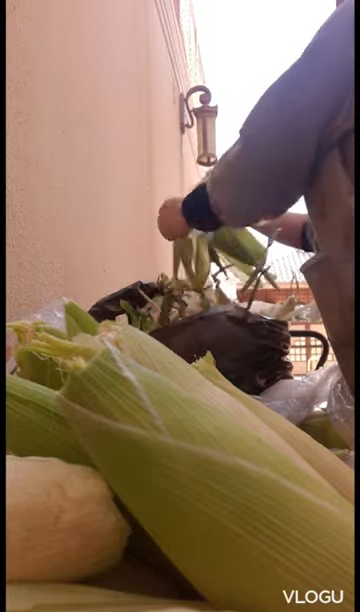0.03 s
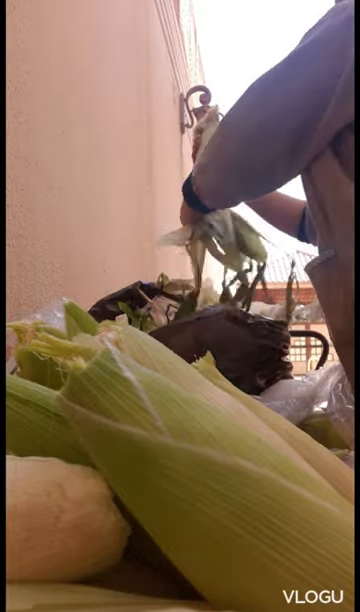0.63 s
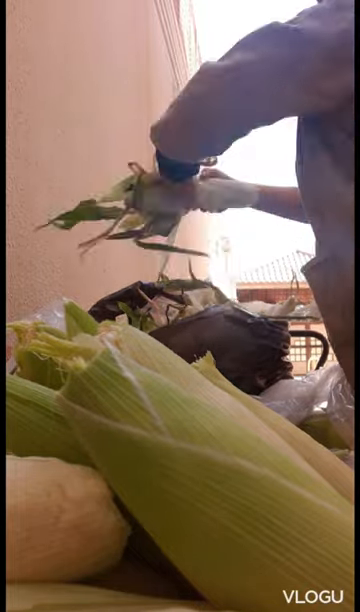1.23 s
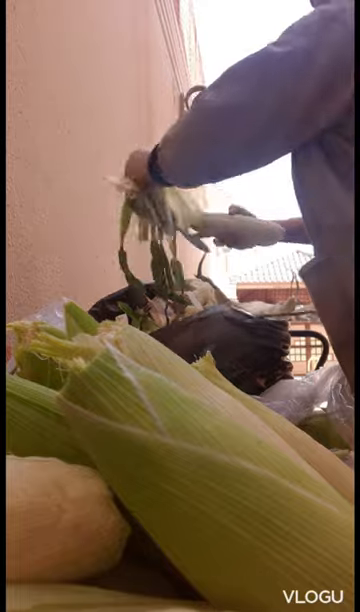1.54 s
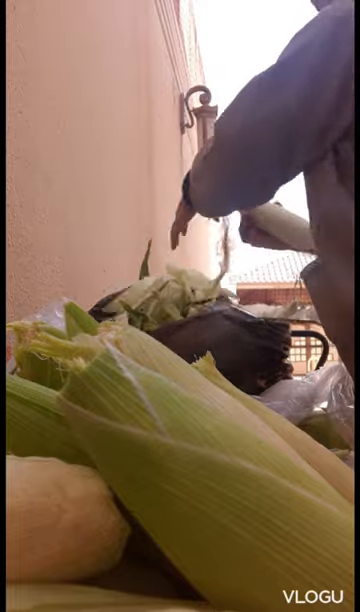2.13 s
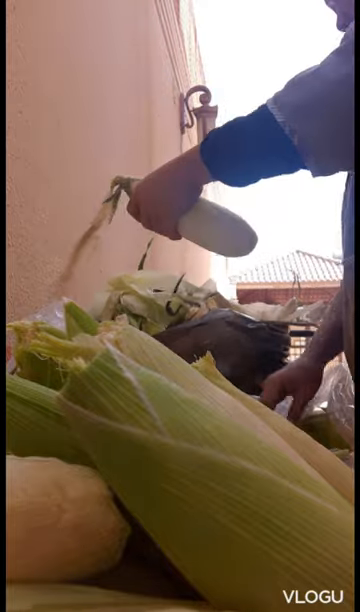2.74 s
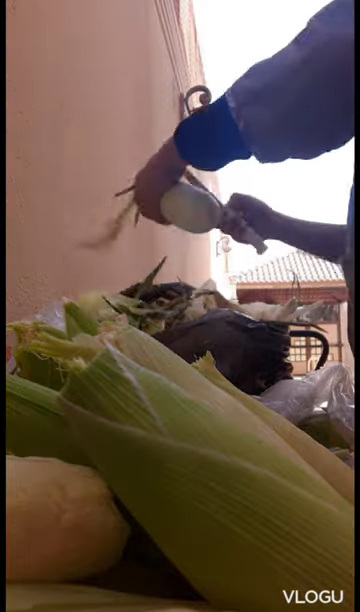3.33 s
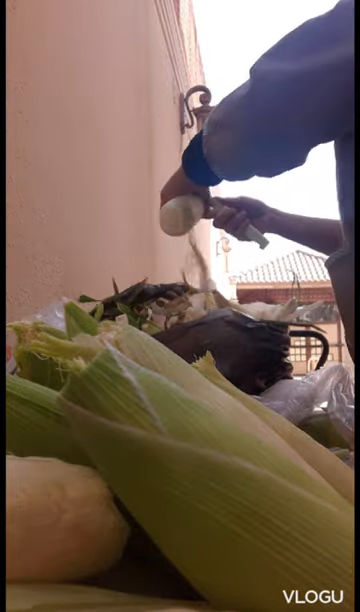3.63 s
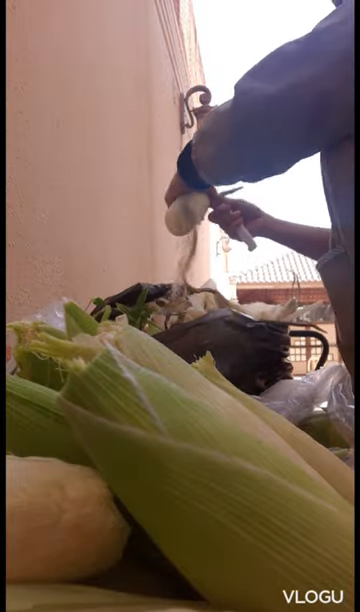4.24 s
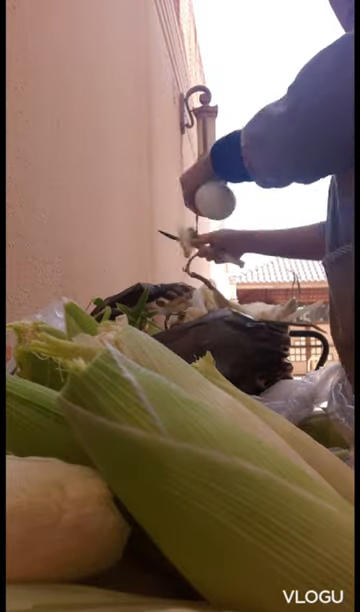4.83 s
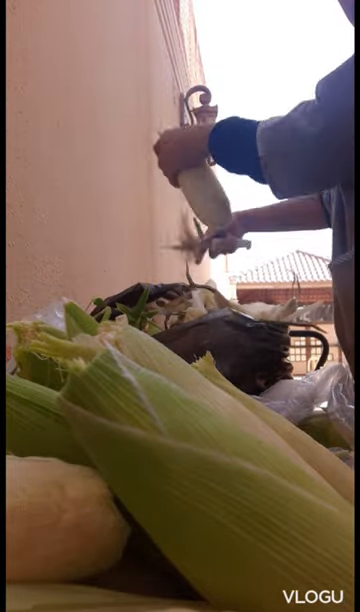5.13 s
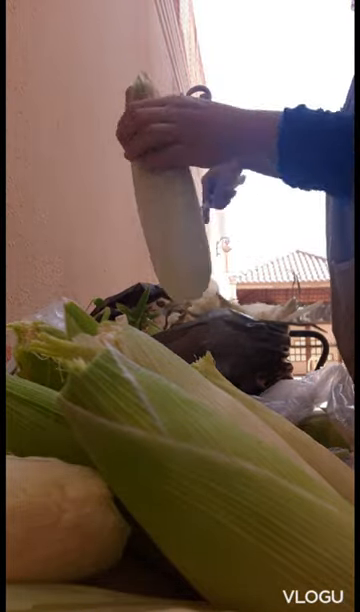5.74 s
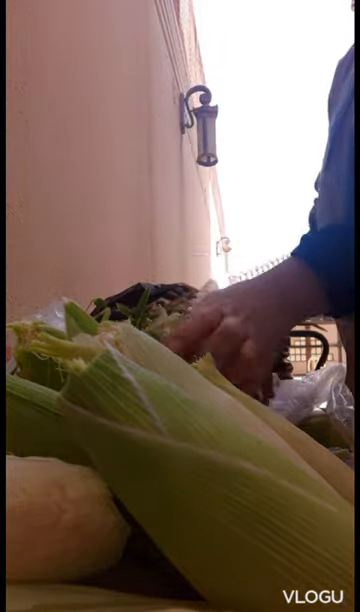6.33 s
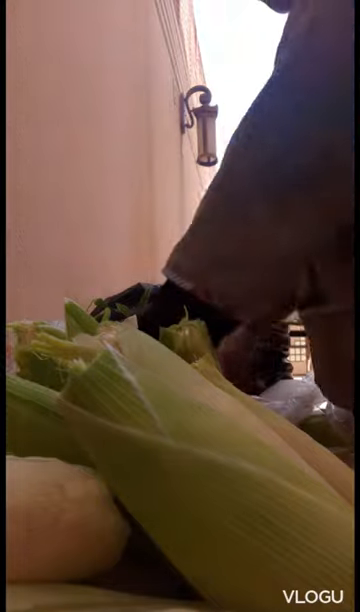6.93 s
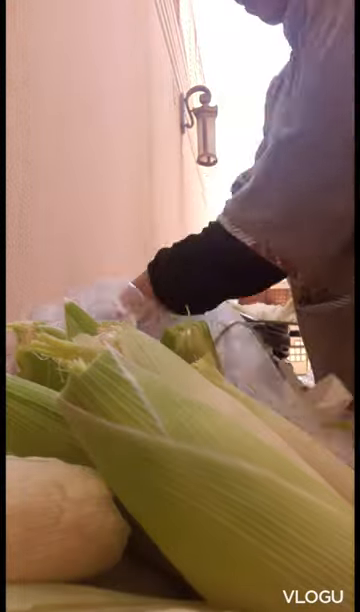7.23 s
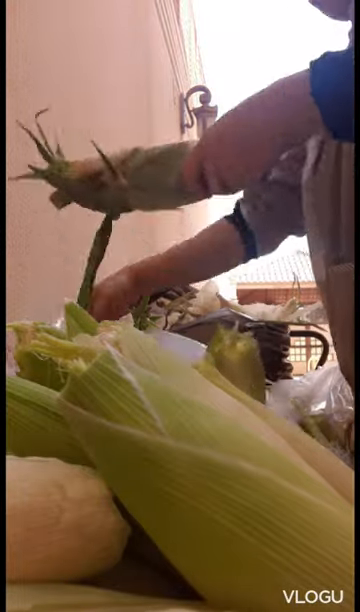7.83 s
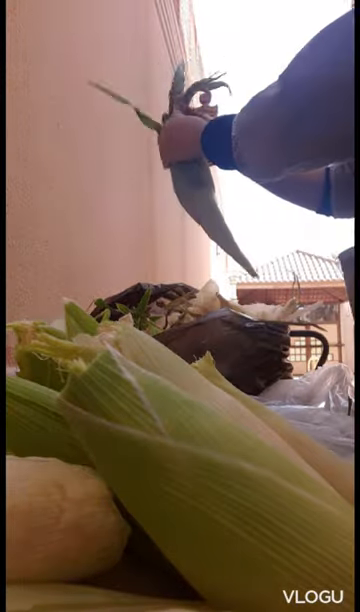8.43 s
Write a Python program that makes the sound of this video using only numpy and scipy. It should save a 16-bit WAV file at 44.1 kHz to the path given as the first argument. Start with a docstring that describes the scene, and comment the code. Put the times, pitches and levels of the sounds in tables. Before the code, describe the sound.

Someone husks corn with crisp rips and one loud snap, trims it with a knife, then rummages in a plastic bag.

```python
"""Husking corn on a balcony

Leaves rustle and tear as hands pull them off, the stalk snaps, and a knife clicks through the tip. The cob
knocks on the table beside the microphone, and the next ear is pulled from a crinkling bag and gripped. Rustles
and tears are runs of tiny clicks from creases and fibres; knocks are dying tones. Traffic hums in the distance,
and the close walls add a short ring."""
import sys
import numpy as np
from scipy import signal
from scipy.fft import rfft, irfft, next_fast_len
from scipy.io import wavfile
from scipy.ndimage import uniform_filter1d

SR = 44100
rng = np.random.default_rng(int(sys.argv[2]) if len(sys.argv) > 2 else 0)


def transcribe(u):
    """Save the signal u as a 16-bit wav file named by the first command-line argument.

    u: samples, shape (n,) or (channels, n), limited to [-1, 1]; the rate is SR.
    q: integer samples, one column per channel.
    """
    v = np.clip(np.atleast_2d(u).T, -1, 1)
    q = np.round(v * 32767).astype(np.int16)
    wavfile.write(sys.argv[1], SR, q)


N = 379260
T = np.arange(N) / SR

# Levels in the tables are relative. A stroke's t is its fastest moment.
# hand strokes through the leaves: t/s, level/dB, rise/s, fall/s
LEAF_STROKES = [(0.17, -57.5, 0.061, 0.027), (0.245, -56, 0.015, 0.025), (0.335, -56.5, 0.0097, 0.022),
                (.425, -54, .01, 0.026), (0.492, -46, 0.02, 0.028), (0.61, -48.5, 0.053, 0.073),
                (0.69, -52.5, 0.033, 0.02), (0.84, -64, .06, 0.076), (1.275, -53, 0.11, 0.037),
                (1.35, -52, 0.0056, 0.015), (1.495, -48.5, 0.072, 0.06), (1.575, -51, 0.032, 0.032),
                (1.69, -59.5, 0.023, 0.048), (1.875, -54, 0.012, 0.036), (1.94, -48.5, .02, 0.051),
                (2.005, -48, 0.043, 0.054), (2.235, -54, 0.012, 0.055), (2.48, -55.5, 0.042, 0.028),
                (3.52, -60, .07, 0.05), (3.57, -58.5, 0.04, 0.024), (3.81, -69.5, 0.041, .07),
                (4.11, -61, 0.041, .02), (4.465, -60, 0.005, 0.063), (4.55, -61, 0.047, 0.021),
                (5.21, -55.5, 0.011, 0.04), (5.56, -66.5, 0.045, 0.034), (5.73, -73.5, 0.1, 0.026)]
# pulls on the plastic bag, then, from 8.0 s, the next ear's husk being gripped: t/s, level/dB, rise/s, fall/s
BAG_AND_HUSK_STROKES = [(6.09, -59.5, 0.028, 0.059), (6.21, -50.5, 0.046, 0.047), (6.69, -63, 0.0099, 0.063),
                        (6.815, -53.5, 0.056, 0.077), (7.13, -42, 0.081, 0.079), (7.152, -40, 0.014, .012),
                        (7.275, -40.5, 0.041, 0.044), (7.365, -42, 0.03, 0.044), (7.44, -46.5, 0.034, 0.086),
                        (7.50, -52, 0.018, 0.077), (7.597, -50, 0.0045, 0.0091), (7.8, -60, 0.35, 0.19),
                        (8.01, -51, 0.0367, 0.027), (8.085, -48, 0.015, 0.034), (8.19, -48.5, 0.076, 0.16),
                        (8.355, -47.5, 0.068, 0.048), (8.437, -48.5, 0.00656, 0.013), (8.6, -58, 0.13, 0.043)]
# ears of corn scraping together in the bag: t/s, level/dB, rise/s, fall/s
EAR_SHOVES = [(6.835, -56, 0.0098, 0.033), (7.03, -47.5, 0.023, 0.011), (7.072, -42, 0.0041, .01),
              (7.105, -42, 0.0055, 0.01), (7.155, -39.5, 0.014, 0.0073), (7.27, -47, 0.027, 0.019),
              (8.18, -53, .03, .03)]
# sleeve and corn silk brushing as the knife is fetched: t/s, level/dB, rise/s, fall/s
SLEEVE_BRUSHES = [(2.79, -65.5, 0.023, 0.031), (2.89, -65, 0.013, 0.029), (3.05, -65, 0.055, 0.04),
                  (3.21, -68, 0.061, 0.06), (3.38, -68.5, 0.043, .04)]
# tears and cuts: t/s, length/s, juicy stalk level/dB, dry fibre level/dB, hollow ring f/Hz
HUSK_TEARS = [(0.0, 0.05, -32.5, -37.5, 1380), (0.606, 0.021, -33.5, -48, 1500),
              (0.637, 0.048, -38.5, -44, 1650), (0.683, 0.019, -45, -51, 1400),
              (2.197, 0.04, -59, -52.5, 2900), (3.631, 0.027, -36, -59, 1250),
              (3.87, 0.025, -37.5, -45.5, 1650), (3.896, 0.0226, -35.5, -45, 1420),
              (4.076, 0.046, -53, -55, 1500), (4.25, 0.026, -46, -52, 1700), (4.287, 0.026, -48, -42, 1640),
              (4.318, 0.014, -51, -47, 1270), (4.712, 0.025, -49, -46.5, 1150),
              (5.202, 0.022, -61, -54, 1600), (8.337, 0.026, -48, -46.5, 2800)]
# leaf ribs and fibres cracking: t/s, level/dB, f/Hz
RIB_CRACKS = [(0.0065, -28, 1950), (0.0206, -25.5, 3380), (0.0218, -29.5, 1260), (0.0333, -19, 1310),
              (0.0408, -38.5, 1470), (0.562, -32.5, 2997), (0.5922, -32.5, 2980), (0.6082, -27, 1293),
              (0.6183, -32, 1500), (0.6395, -21.5, 1550), (0.642, -27, 2550), (0.652, -32, 2700),
              (0.664, -32, 2400), (0.6787, -30, 1360), (0.756, -34.5, 4330), (0.935, -40.5, 3300),
              (0.975, -45, 2972), (1.042, -50, 3000), (1.1753, -31, 1510), (1.1848, -32, 3080),
              (2.1996, -34, 1630), (2.235, -37, 2900), (3.642, -40, 1240), (3.8725, -35, 1800),
              (3.886, -36, 1351), (3.908, -26, 1450), (3.915, -31, 1350), (4.111, -37, 1700),
              (4.1185, -39, 1500), (4.252, -39, 1900), (4.3, -31, 1955), (4.309, -32, 1700),
              (4.322, -31, 1224), (4.3306, -30, 1360), (4.342, -28, 1250), (4.4621, -44.5, 3240),
              (4.498, -38.5, 2810), (6.145, -31, 1750), (6.2044, -34, 2390), (6.8069, -29.5, 1310),
              (7.1, -31, 760), (7.211, -23.5, 2090), (8.009, -29.5, 1830), (8.0696, -23.5, 1630),
              (8.084, -29.5, 3410), (8.4308, -22.5, 3170)]
# the knife snapping through the tip: t/s, level/dB
KNIFE_CUTS = [(4.6018, -36), (4.6108, -27), (4.6194, -34), (4.629, -31.5), (4.7114, -23.5), (4.7132, -24),
              (4.7257, -27), (4.7287, -23.5)]
# the two pops of the breaking stalk: t/s, level/dB, f/Hz, rise/s
STALK_POPS = [(1.0912, -9, 1390, .0007), (1.0963, -20, 1000, .0004)]
# knocks on the table: t/s, level/dB, contact time/s
TABLE_KNOCKS = [(2.776, -34, 0.0032), (6.145, -29.5, 0.0031), (6.211, -19, 0.0028), (6.822, -37, 0.0027),
                (7.034, -21.5, 0.0055), (7.064, -33, 0.0014), (7.269, -28, 0.0038), (8.014, -33, 0.0027),
                (8.23, -22, 0.0086), (8.247, -23.5, 0.001), (8.331, -32, 0.0023), (8.37, -27, 0.0018),
                (8.409, -25, 0.002), (8.427, -25.5, 0.0025), (8.469, -27, 0.0021)]
# ringing tones of the table and the cob: f/Hz, level/dB, time to fade by 60 dB/s
TABLE_TONES = [(67, -20, 0.94), (82.4, -2.5, 0.14), (109.8, -4, 0.19), (186, -14.5, 0.17),
               (219, -12.5, 0.1), (281, -10.5, 0.084), (315.5, -4, 0.11)]
COB_TONES = [(790, 0, 0.018), (1084, -2, 0.03), (1384, -2, 0.028), (1760, -3.5, .02), (2470, -13, 0.012)]
# one engine in the traffic: t/s, firing f/Hz, level/dB
ENGINE_COURSE = [(0.0, 102.5, -47.5), (0.6, 108.8, -55), (1.1, 110.8, -53), (1.6, 110, -63),
                 (2.101, 124.5, -63), (2.8, 106.5, -54), (3.1, 115.3, -66), (3.5, 125.8, -53),
                 (4.6, 127.8, -54.5), (5.3, 107.3, -65)]
# tones of the street's hum: f/Hz, level/dB
HUM_TONES = [(74, -63), (274, -76), (329, -66.5)]

# each sound's spectrum, or how strong it is from bass to treble: f/Hz, level/dB
LEAF_SPECTRUM = [(60, -19), (170, -6.5), (330, 15), (550, -1), (850, -2), (1500, 2), (2100, -1), (3600, -2),
                 (6300, -5), (8000, -19.5), (10000, -25.5), (12500, -17), (16000, -22.5)]
BAG_SPECTRUM = [(40, -16.5), (100, 16.5), (200, 0.5), (330, 15.5), (600, 4), (1300, 3.5), (2100, 2.5),
                (3500, -3.5), (6300, -4), (8000, -21), (10000, -26), (12500, -16.5), (16000, -19.5)]
STALK_SPECTRUM = [(100, -23.5), (350, -3), (600, -10.5), (850, -17), (1150, -4), (1420, -4), (1750, -4.5),
                  (2400, -6.5), (3000, -16), (4000, -18), (10000, -51.5)]
FIBRE_SPECTRUM = [(500, -9.5), (1600, -5.5), (2100, -0.5), (2500, 1), (3100, -3.5), (4000, -3.5),
                  (4900, -4), (6300, -8.5), (8000, -20), (10000, -30.5), (12500, -19), (16000, -21)]
RIB_SPECTRUM = [(100, -27), (500, -19), (1000, 2), (4000, 2), (7000, 10), (10000, -5.5)]
SPLINTER_SPECTRUM = [(100, -34), (200, -10), (320, 4.5), (550, -5.5), (900, 3.5), (1450, -1), (1900, -2),
                     (2400, -3), (3000, -4.5), (4000, -5.5), (5000, -8.5), (6500, -13), (8000, -25),
                     (10000, -38), (12500, -28.5), (16000, -37)]
KNIFE_SPECTRUM = [(300, -14.5), (900, -13), (1350, -7), (2000, -10), (2500, -8), (3050, -1.5), (4000, -2.5),
                  (4800, -10.5), (5600, -7.5), (6800, -14.5), (8500, -25), (10000, -30.5), (13000, -27),
                  (16000, -24.5)]
SHOVE_SPECTRUM = [(150, -9), (400, -6), (850, 5), (1500, -0.5), (2300, -11), (5000, -43)]
BRUSH_SPECTRUM = [(800, -4), (3000, -1.5), (5200, 0), (6500, -1.5), (8500, -23), (15000, -20)]
TYRE_SPECTRUM = [(25, -14.5), (50, 1.5), (70, -5.5), (115, 3), (155, -8), (210, -9), (340, 2), (460, -9.5),
                 (620, -12.5), (850, -8), (1150, -19.5), (1700, -21.5), (2400, -29.5), (5000, -51.5)]
TRAFFIC_SPECTRUM = [(25, -17.5), (45, 10.5), (70, -0.5), (115, 6), (155, -4.5), (210, -5), (340, -2.5),
                    (460, -13.5), (620, -20), (880, -9), (1150, -15), (1700, -19), (2400, -37.5),
                    (5000, -49)]
HISS_SPECTRUM = [(500, -8), (2500, -8), (6000, 1), (9500, -9.5), (16000, -0.5)]

# balance of the microphone's two openings: f/Hz, left minus right level/dB
MIC_BALANCE = [(60, -3.5), (200, -4.5), (400, -7), (700, -9), (1000, -11), (1350, -13), (2100, -4),
               (4200, 4), (8000, -3), (15000, -5)]
# extra balance for where the stalk and the bag are: f/Hz, left minus right level/dB
STALK_BALANCE = [(600, 1), (1300, -2.5), (2200, -3), (3500, -2), (6000, 1), (10000, 0)]
BAG_BALANCE = [(200, 0), (600, 2), (1200, 4.5), (2000, 1), (4000, -0.5), (10000, -1.5)]
# how far the right side lags the left: f/Hz, phase/rad
RIGHT_LAG = [(60, 0), (650, 0.22), (900, 1), (1150, 2), (1400, 3), (1900, 3.5), (2500, 3.5), (3000, 6.5),
             (3700, 6.5), (4400, 5), (6200, 4.5), (7000, 5.5), (8000, 8)]
# how alike left and right are for sound from all around: f/Hz, likeness (1 = the same)
STEREO_LIKENESS = [(60, 0.98), (300, 1), (650, 0.89), (1000, 0.59), (1500, 0.27), (2500, 0.088),
                   (16000, 0.13)]


def rustle(gain, spectrum, per_s, spread_db, clump_db, rub):
    """Creases flip in clumps while surfaces rub; faster handling flips more of them."""
    speed = gain / gain.max()
    creases = crackle(per_s * np.sqrt(speed), spread_db, N)
    creases /= (speed + 1e-3) ** .25  # so that more clicks do not also mean more loudness
    clumps = normalise(from_db(clump_db * drift(130)))
    moving = speed > .01
    creases /= np.sqrt(np.mean(creases[moving] ** 2))
    rubbing = rub * rng.standard_normal(N)
    return shape(gain * clumps * (creases + rubbing), spectrum)


def ticks(gain, per_s, spread_db):
    """Single fibres or creases give way now and then under the hands."""
    return shape(gain * crackle(per_s, spread_db, N), FIBRE_SPECTRUM)


def husk_leaves(grip_db=-70.5, grip_end_s=3.08):
    """The husk rustles and ticks with each stroke, and faintly while it is just held."""
    grip = swell([0, grip_end_s], [grip_db, grip_db])
    handling = np.hypot(strokes(LEAF_STROKES), grip)
    leaves = rustle(handling, LEAF_SPECTRUM, per_s=1500, spread_db=2, clump_db=2.2, rub=0.7)
    return from_db(-1) * leaves + from_db(-11) * ticks(handling, per_s=70, spread_db=0)


def parting_fibres(per_s, spread_db, size):
    """Fibres stretch and part one after another, making unevenly spaced clicks."""
    gaps = rng.gamma(3, 1 / 3, 400)
    heights = from_db(spread_db * rng.standard_normal(400))
    signs = rng.choice([-1, 1], 400)
    positions = (np.cumsum(gaps) / per_s * SR).astype(int)
    return normalise(np.bincount(positions, signs * heights, size)[:size])


def husk_tears():
    """Fibres part under a growing pull: the juicy stalk rings hollow, the dry leaf rasps."""
    stalk, fibre = np.zeros((2, N))
    for start, length, stalk_db, fibre_db, hz in HUSK_TEARS:
        size = int(length * SR)
        pull = np.linspace(.1, 1, size) ** .05
        parting = parting_fibres(per_s=900, spread_db=4, size=6000)
        parting += 0.14 * rng.standard_normal(6000)  # rubbing
        rip = normalise(pull * np.clip(parting[:size], -12, 12))
        rip = np.pad(rip, (0, 600))  # room for the ring to die away
        hollow = signal.lfilter(*signal.iirpeak(hz, Q=3.4, fs=SR), rip)
        add(stalk, start, from_db(stalk_db) * (rip + from_db(-0.5) * hollow))
        add(fibre, start, from_db(fibre_db) * rip)
    return from_db(-10.5) * shape(stalk, STALK_SPECTRUM) + from_db(0.5) * shape(fibre, FIBRE_SPECTRUM)


def splinter(decay_s):
    """A brief spray of tiny breaks, equally strong from bass to treble."""
    clicks = crackle(per_s=16000, spread_db=1, size=1000)
    spectrum = rfft(clicks * np.exp(-T[:1000] / decay_s))
    power = uniform_filter1d(np.abs(spectrum) ** 2, size=30)
    spray = irfft(spectrum / np.sqrt(power))[:800]
    return spray / np.linalg.norm(spray)


def rib_cracks():
    """A leaf rib gives way with a sharp edge of sound and rings for a few cycles."""
    rings, edges = np.zeros((2, N))
    for start, db, hz in RIB_CRACKS:
        spray = splinter(decay_s=.001)
        ring = np.convolve(spray, dying_tone(hz, fade_s=3.5 / hz, size=500))
        add(rings, start, from_db(db) * ring / np.abs(ring).max())
        add(edges, start, from_db(db + 5) * spray)
    return from_db(-6) * shape(rings, RIB_SPECTRUM, keep_power=False) + shape(edges, FIBRE_SPECTRUM)


def stalk_pops():
    """The breaking stalk pops twice: hollow tones that swell and die within a few cycles."""
    pops, t = np.zeros(N), T[:1000]
    for start, db, hz, rise in STALK_POPS:
        loudness = from_db(db) * t / rise * np.exp(1 - t / rise)
        add(pops, start, loudness * np.sin(2 * np.pi * hz * t))
    return cut_bass(pops, hz=448, order=2)  # the pops carry little bass


def stalk_splinters(creak_s=1.088):
    """The stalk creaks, its fibres burst as it breaks, and the rest part in a dying crackle."""
    spray, break_s = np.zeros(N), STALK_POPS[0][0]
    add(spray, creak_s, from_db(-19.5) * splinter(decay_s=.003))
    add(spray, break_s, from_db(-4.5) * splinter(decay_s=.002))
    last_fibres = crackle(per_s=1500, spread_db=0.91, size=6000) * np.exp(-T[:6000] / .025)
    add(spray, break_s, from_db(-25) * last_fibres)
    return shape(spray, SPLINTER_SPECTRUM)


def knife_clicks():
    """The last tough fibres of the tip give way to the blade in crisp, bright clicks."""
    sprays = np.zeros(N)
    for start, db in KNIFE_CUTS:
        add(sprays, start, from_db(db + 11.5) * splinter(decay_s=.0022))
    return shape(sprays, KNIFE_SPECTRUM)


def cob_tap(start_s=6.1425):
    """The bare cob's stiff core rings briefly as it lands on the table."""
    ring = sum((-1) ** k * from_db(db) * dying_tone(hz, fade_s, size=3000)
               for k, (hz, db, fade_s) in enumerate(COB_TONES))
    tap = np.zeros(N)
    add(tap, start_s, from_db(-27) * ring)
    return tap


def table_knocks():
    """Soft pushes set the table ringing; a longer contact sounds duller."""
    force, t = np.zeros(N), T[:2000]
    for start, db, contact_s in TABLE_KNOCKS:
        push = t * np.exp(-5 * t / contact_s)
        add(force, start, from_db(db) * push / push.sum())
    ring = sum(from_db(db) * dying_tone(hz, fade_s, size=16000) for hz, db, fade_s in TABLE_TONES)
    return signal.oaconvolve(force, ring)[:N]


def plastic_bag(pulling):
    """The pulled plastic rustles, and then the next ear's husk as it is gripped, while the ears inside scrape
    dully against each other."""
    plastic = rustle(pulling, BAG_SPECTRUM, per_s=3200, spread_db=2.6, clump_db=3, rub=0.51)
    ears = rustle(strokes(EAR_SHOVES), SHOVE_SPECTRUM, per_s=1500, spread_db=1, clump_db=1, rub=0.4)
    return from_db(0.5) * plastic + ears


def sleeve_brushes():
    """A sleeve and loose corn silk rub lightly, making soft swishes of noise."""
    return shape(strokes(SLEEVE_BRUSHES) * rng.standard_normal(N), BRUSH_SPECTRUM)


def street(nearest_s=2.83, pass_width_s=0.67, waver_db=5):
    """Distant traffic roars, tyres swell and fade as a vehicle passes, an engine labours over a hum."""
    roar = from_db(-54) * shaped_noise(TRAFFIC_SPECTRUM)
    distance = np.hypot(1, (T - nearest_s) / pass_width_s)  # 1 at the nearest point
    tyres = from_db(-48) / distance * shaped_noise(TYRE_SPECTRUM)
    times, firing_hz, levels = np.transpose(ENGINE_COURSE)
    phase = 2 * np.pi * np.cumsum(np.interp(T, times, firing_hz) + 2.82 * drift(20)) / SR
    engine = swell(times, levels + 1) * np.sin(phase) * from_db(waver_db * drift(11))
    hum = np.zeros(N)
    for hz, db in HUM_TONES:
        loudness = np.sqrt(2) * from_db(db + waver_db * drift(8.8))
        hum += loudness * np.sin(2 * np.pi * hz * T + 0.21 * drift(5.3))
    hiss = from_db(-79) * shaped_noise(HISS_SPECTRUM)
    return roar + tyres + engine + hum + hiss


def balcony(sound, echo_db, fade_s=0.25, size=13000, block_size=6000):
    """Direct sound plus wall echoes, drawn anew for each short block as if the hands had moved."""
    stereo = np.array([sound, sound])
    onset = np.clip((T[:size] - .0005) / .002, 0, 1)
    decay = onset * from_db(-60 * T[:size] / fade_s)
    decay *= from_db(echo_db) / np.linalg.norm(decay)
    for i in range(0, N, block_size):
        piece = sound[i:i + block_size]
        if np.abs(piece).max() > 1e-6:
            for channel, echoes in zip(stereo, surround_noise(size) * decay):
                add(channel, i / SR, signal.fftconvolve(piece, echoes))
    return stereo


def strokes(rows, rounding=0.3):
    """Loudness of hand strokes: each gathers speed and dies away; overlaps add in power."""
    power = np.zeros(N)
    for peak_s, db, rise, fall in rows:
        from_peak = np.where(T < peak_s, (peak_s - T) / rise, (T - peak_s) / fall)
        drop = np.hypot(from_peak, rounding) - rounding
        power += from_db(db) ** 2 * np.exp(-2 * np.minimum(drop, 20))
    return np.sqrt(power)


def crackle(per_s, spread_db, size):
    """Random clicks, many small and a few large; always at least one."""
    heights = from_db(spread_db * np.minimum(rng.exponential(1, size), 4))
    signs = rng.choice([-1, 1], size)
    chance = rng.random(size)
    happens = chance <= np.maximum(per_s / SR, chance.min())
    return normalise(heights * signs * happens)


def dying_tone(hz, fade_s, size):
    """A sine wave that fades by 60 dB in fade_s seconds."""
    return np.sin(2 * np.pi * hz * T[:size]) * from_db(-60 * T[:size] / fade_s)


def surround_noise(size):
    """Stereo white noise from all sides: left and right are alike in the bass, unlike in the treble."""
    mid, side = rfft(rng.standard_normal((2, size)))
    alike = np.clip(at_hz(STEREO_LIKENESS, np.fft.rfftfreq(size, 1 / SR)), -.99, .99)
    shared = np.sqrt((1 + alike) / 2) * mid
    opposite = np.sqrt((1 - alike) / 2) * side
    return irfft([shared + opposite, shared - opposite], size)


def shaped_noise(spectrum):
    """Noise from all sides with the given spectrum."""
    return np.array([shape(channel, spectrum) for channel in surround_noise(N)])


def shape(sound, spectrum, keep_power=True, size=8192):
    """Give a sound a spectrum, with a filter that never rings ahead of a click (minimum phase)."""
    gain = from_db(at_hz(spectrum, np.fft.rfftfreq(size, 1 / SR)))
    cepstrum = irfft(np.log(normalise(gain) if keep_power else gain))
    cepstrum[1:size // 2] *= 2  # fold the late half of the cepstrum onto the early half
    cepstrum[size // 2 + 1:] = 0
    response = irfft(np.exp(rfft(cepstrum)))
    return signal.oaconvolve(sound, response)[:N]


def lean(stereo, balance):
    """Tilt each frequency to the left or right, giving half the change to each side."""
    return np.array([shape(channel, [(hz, sign * db / 2) for hz, db in balance], keep_power=False)
                     for channel, sign in zip(stereo, (1, -1))])


def cut_bass(sound, hz, order):
    """Weaken everything below hz; a higher order cuts more steeply."""
    return signal.sosfilt(signal.butter(order, hz, "high", fs=SR, output="sos"), sound)


def swell(times, levels_db):
    """A gain that follows the given levels and fades quickly beyond their ends."""
    outside_s = np.maximum(times[0] - T, 0) + np.maximum(T - times[-1], 0)
    return from_db(np.interp(T, times, levels_db)) * np.exp(-np.minimum(outside_s / .02, 50))


def drift(per_s):
    """A random wander that heads for a new value per_s times a second."""
    targets = rng.standard_normal(int(per_s * N / SR) + 2)
    return normalise(np.interp(T * per_s, np.arange(len(targets)), targets))


def at_hz(table, hz):
    """Read between a table's rows on a log-frequency axis."""
    frequencies, values = np.transpose(table)
    return np.interp(np.log(hz + 1e-3), np.log(frequencies), values)


def add(track, start_s, sound):
    """Mix a sound into a track at the given time."""
    i = max(int(start_s * SR), 0)
    track[i:i + len(sound)] += sound[:N - i]


def normalise(x):
    """Scale to an average power of 1."""
    return x / np.sqrt(np.mean(x ** 2) + 1e-20)


def from_db(db):
    """Turn decibels into a gain."""
    return 10 ** (np.asarray(db) / 20)


def scene():
    """Husking at arm's length, bag and table close by, the street beyond."""
    traffic = street()
    husking = balcony(husk_leaves() + sleeve_brushes(), echo_db=0)
    tearing = balcony(husk_tears(), echo_db=-5.5)
    pulling = strokes(BAG_AND_HUSK_STROKES)
    bag = lean(balcony(plastic_bag(pulling), echo_db=1.5), BAG_BALANCE)
    crinkles = from_db(-10) * ticks(pulling, per_s=110, spread_db=2)
    # weaker echoes let the short breaks stand out
    breaks = balcony(rib_cracks() + knife_clicks() + cob_tap() + crinkles, echo_db=-8.5)
    snap = balcony(stalk_pops(), echo_db=-15) + balcony(stalk_splinters(), echo_db=-7)
    return husking + tearing + breaks + lean(snap, STALK_BALANCE) + bag + table_knocks() + traffic


def record(dry):
    """Each side of the microphone has its own tone and the right lags; deep bass and top are cut."""
    left, right = lean(dry, MIC_BALANCE)
    size = next_fast_len(N + 4000)
    lag = at_hz(RIGHT_LAG, np.fft.rfftfreq(size, 1 / SR))
    right = irfft(rfft(right, size) * np.exp(-1j * lag), size)[:N]
    thinned = cut_bass([left, right], hz=68, order=4)
    treble_cut = signal.ellip(12, .1, 80, 15750, fs=SR, output="sos")  # steep, above 15750 Hz
    return signal.sosfilt(treble_cut, np.clip(thinned, -1, 1))


dry = scene()
out = record(dry)
transcribe(out)
```